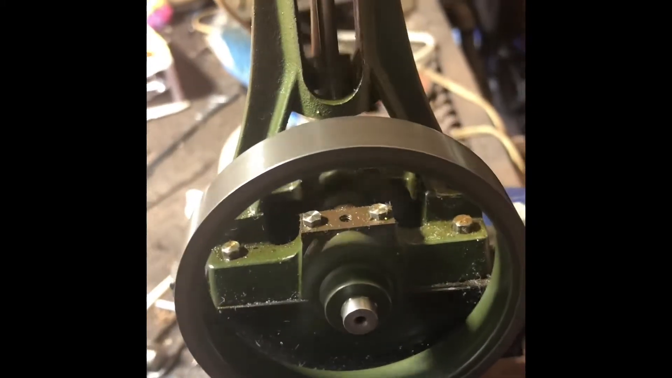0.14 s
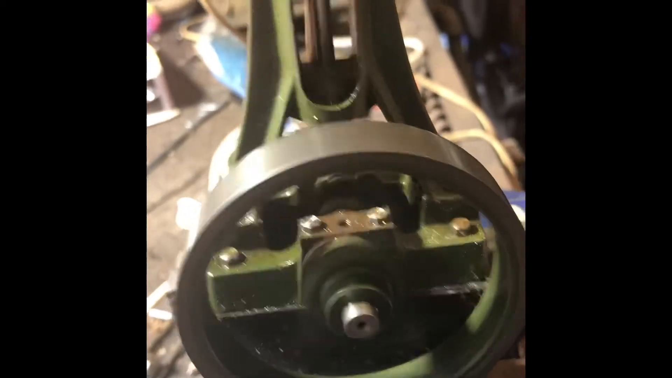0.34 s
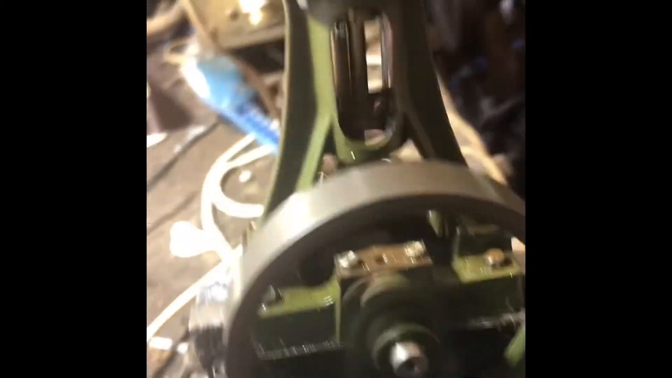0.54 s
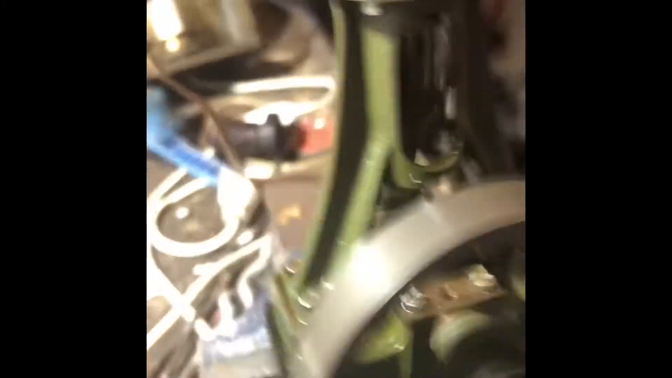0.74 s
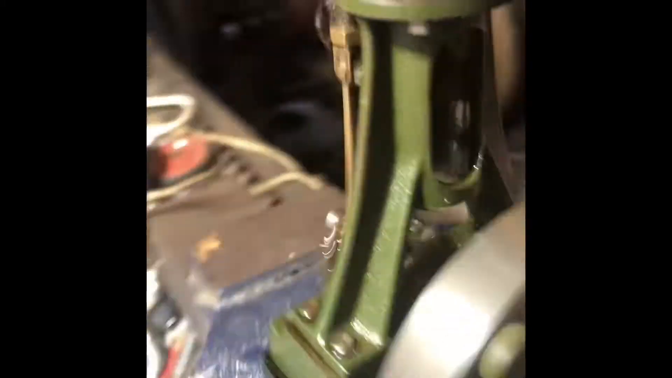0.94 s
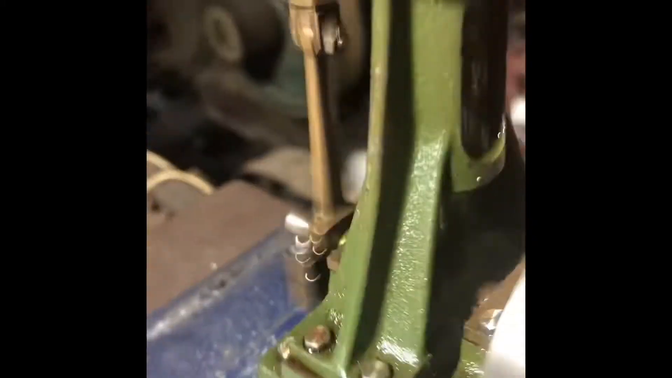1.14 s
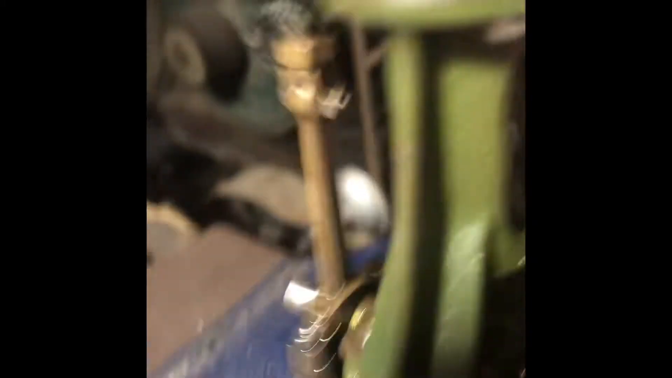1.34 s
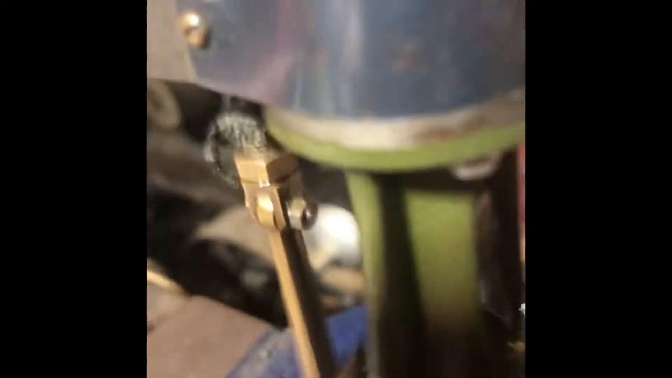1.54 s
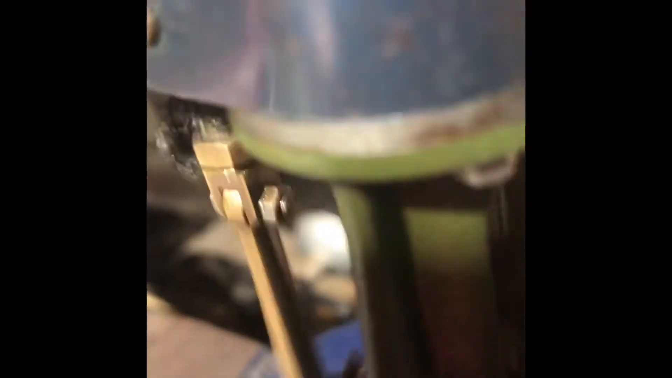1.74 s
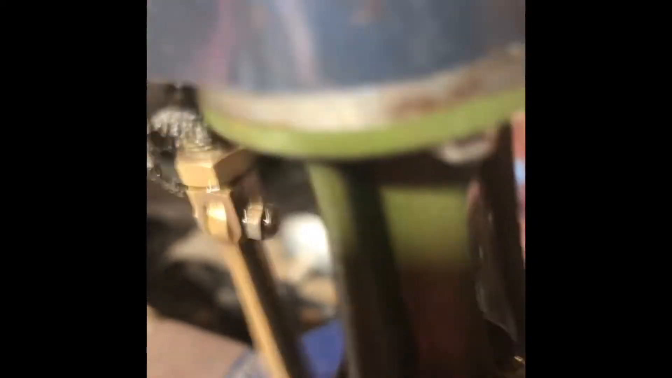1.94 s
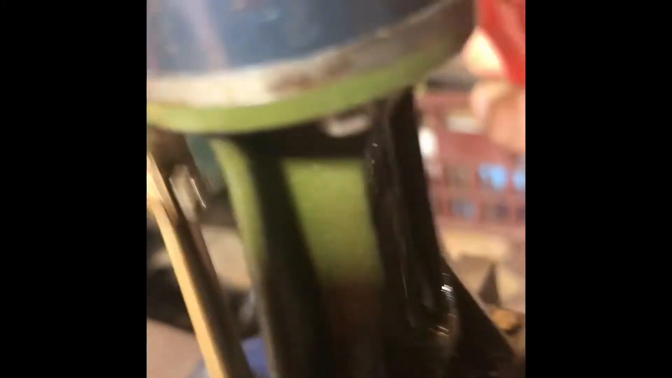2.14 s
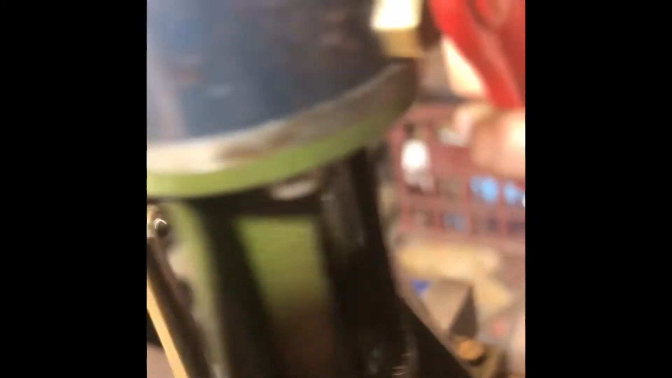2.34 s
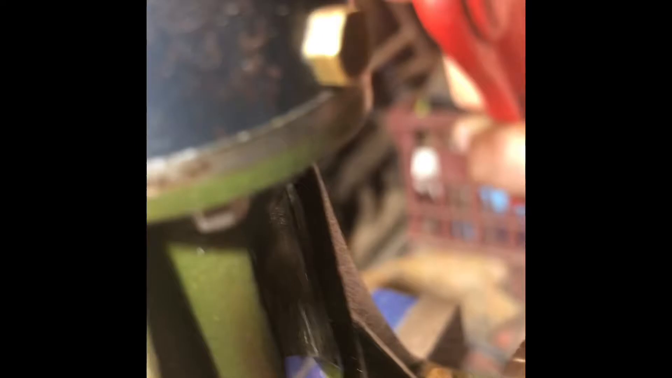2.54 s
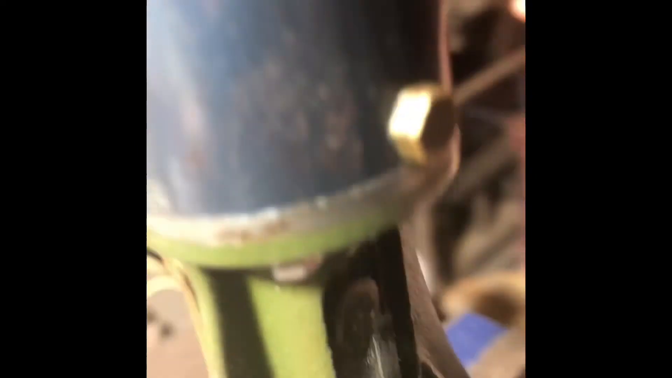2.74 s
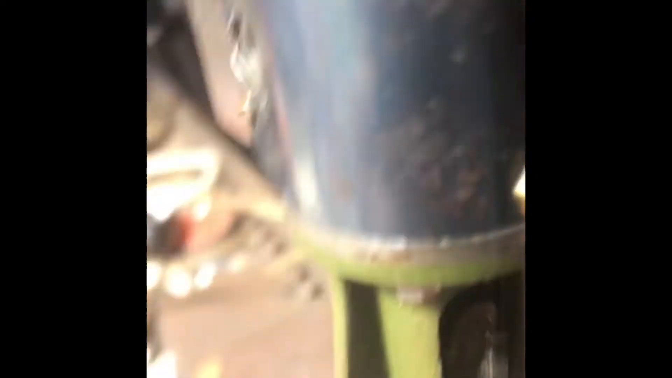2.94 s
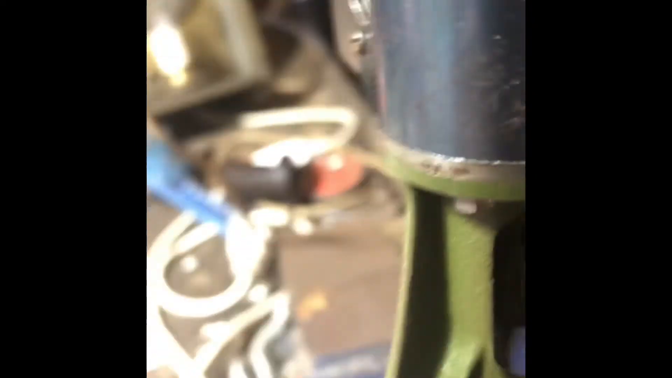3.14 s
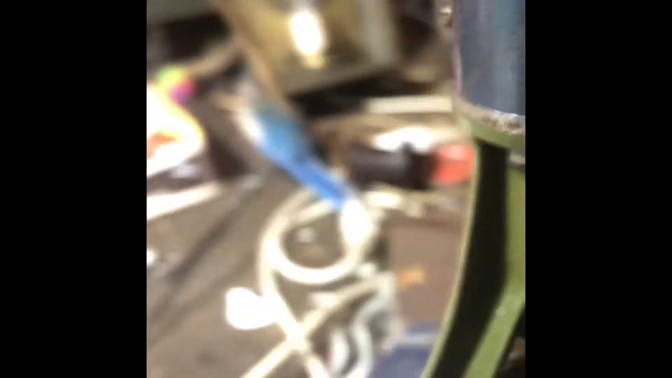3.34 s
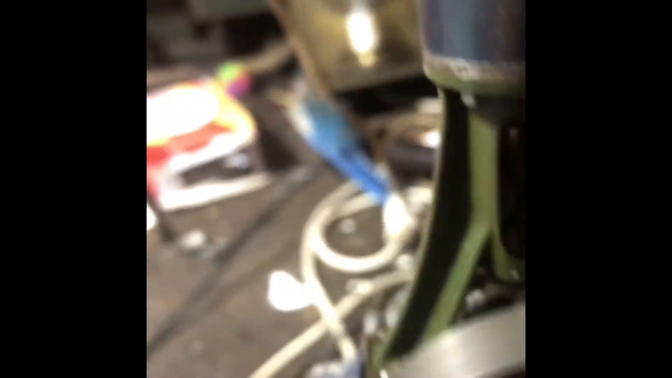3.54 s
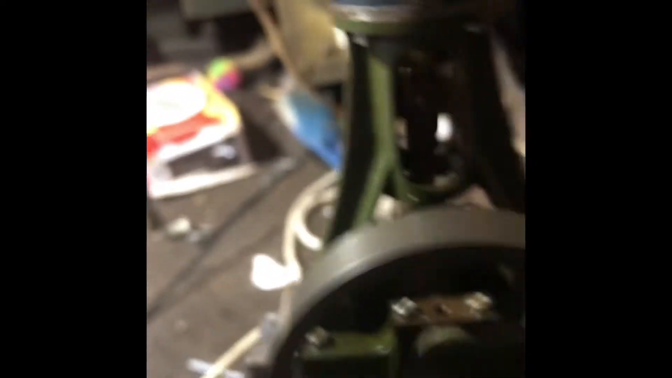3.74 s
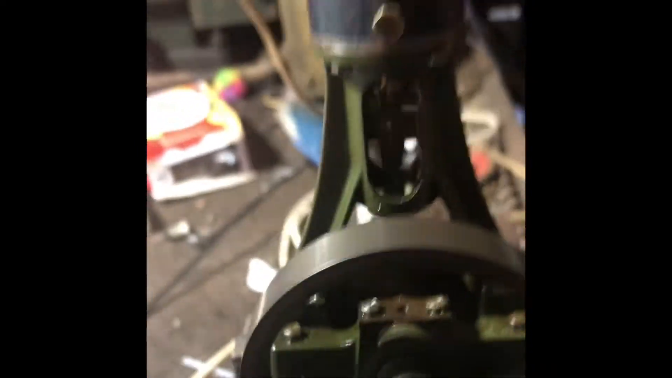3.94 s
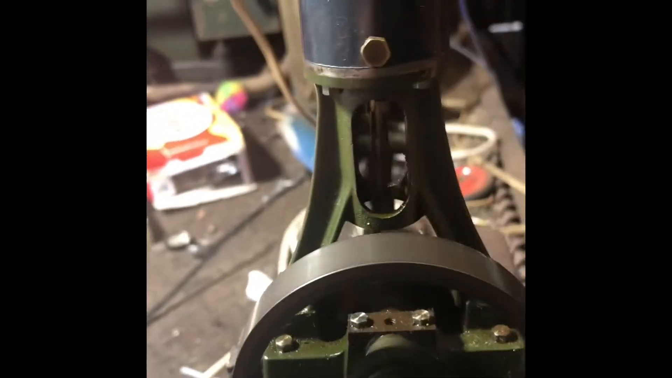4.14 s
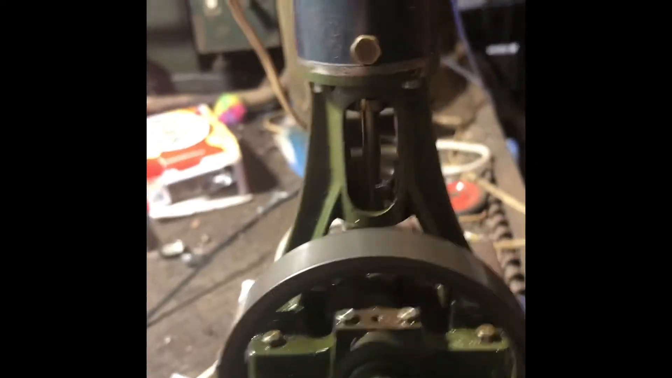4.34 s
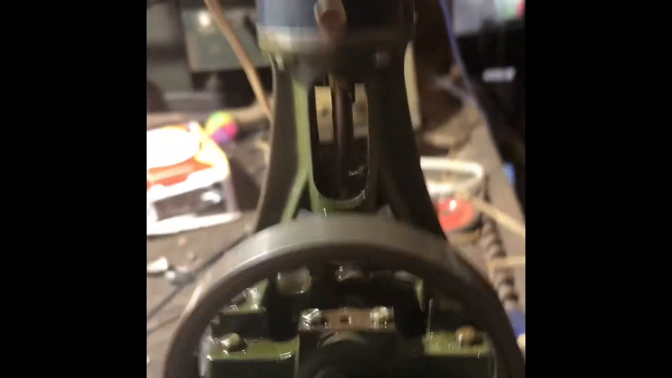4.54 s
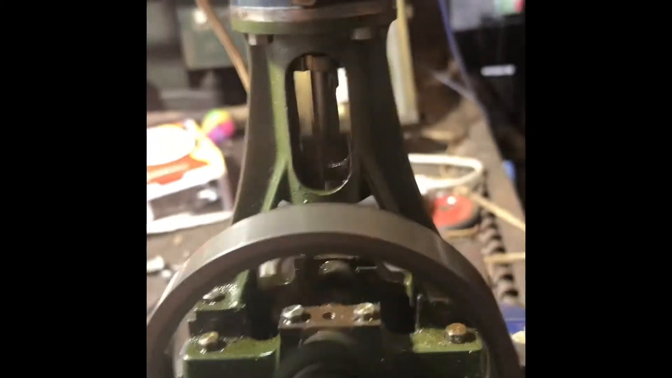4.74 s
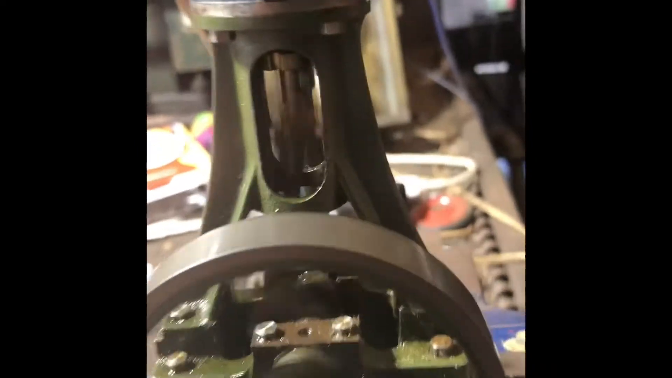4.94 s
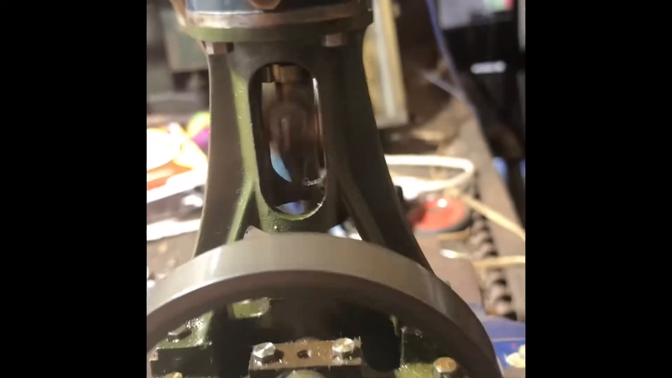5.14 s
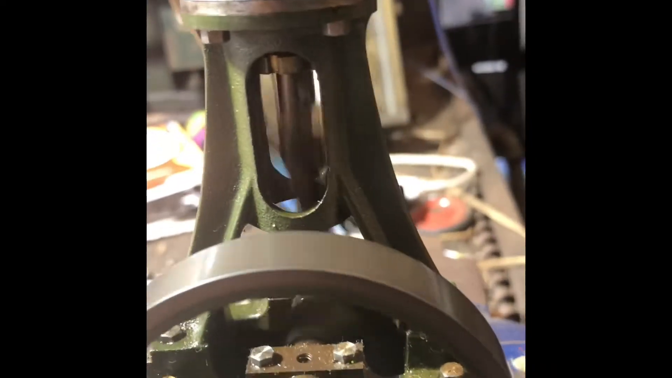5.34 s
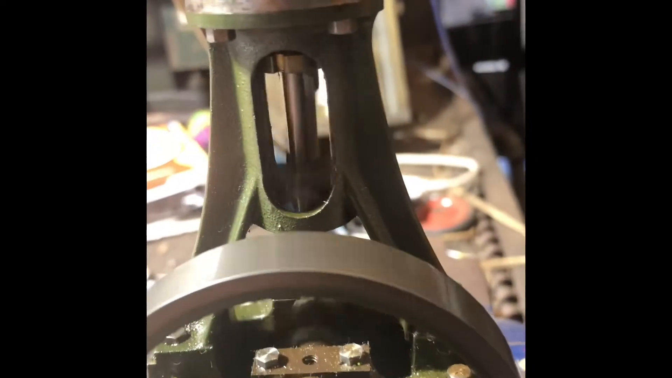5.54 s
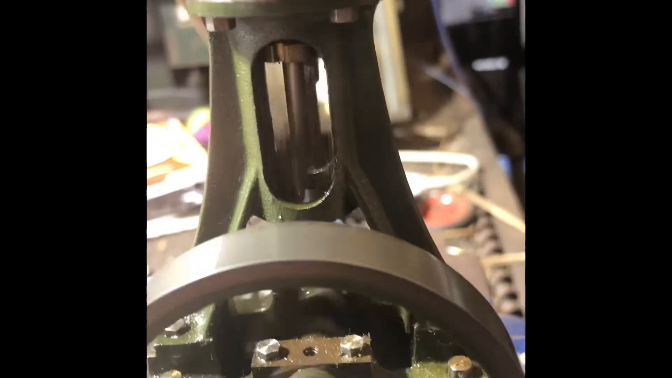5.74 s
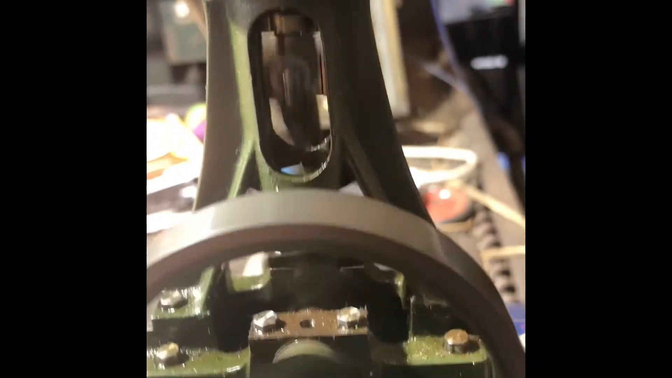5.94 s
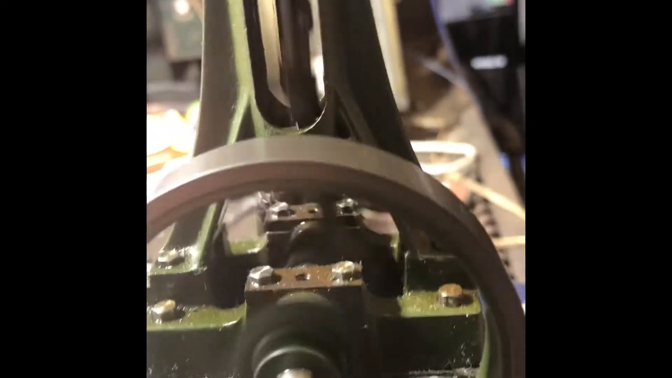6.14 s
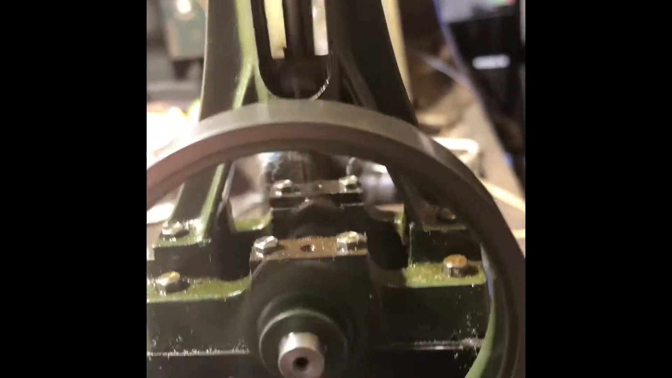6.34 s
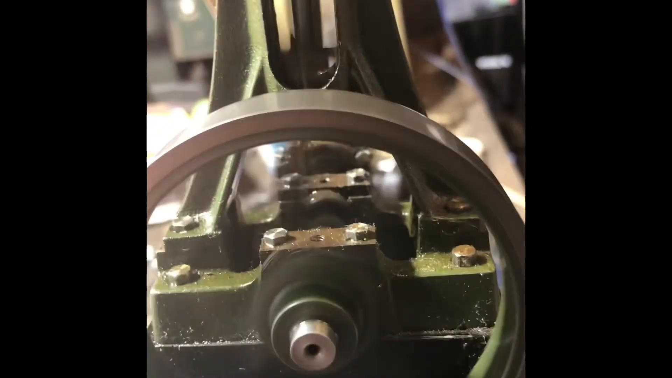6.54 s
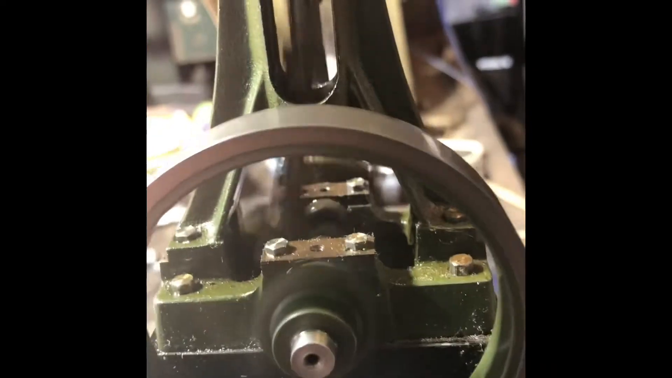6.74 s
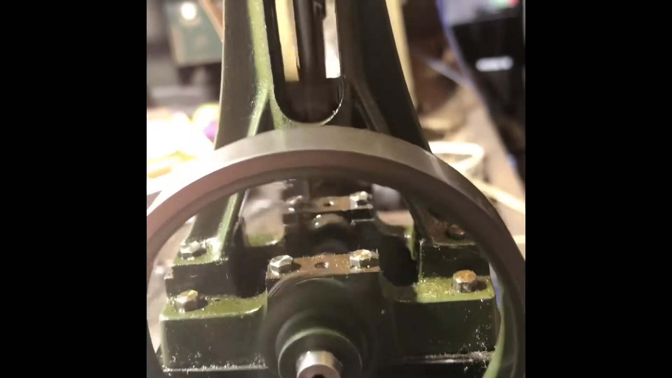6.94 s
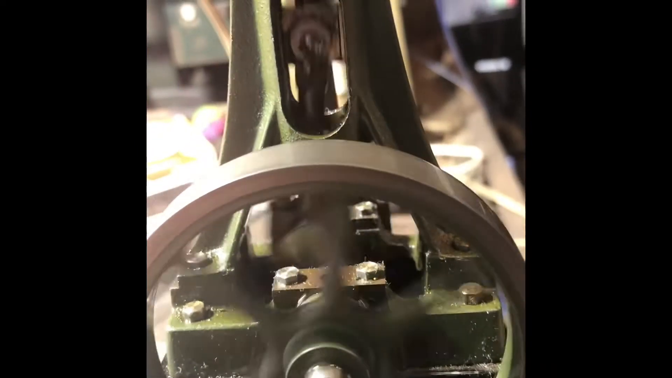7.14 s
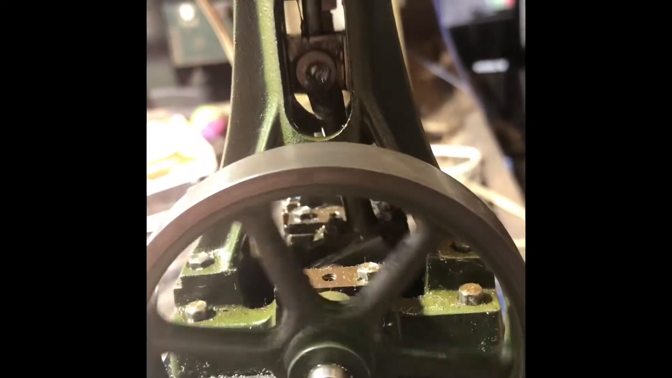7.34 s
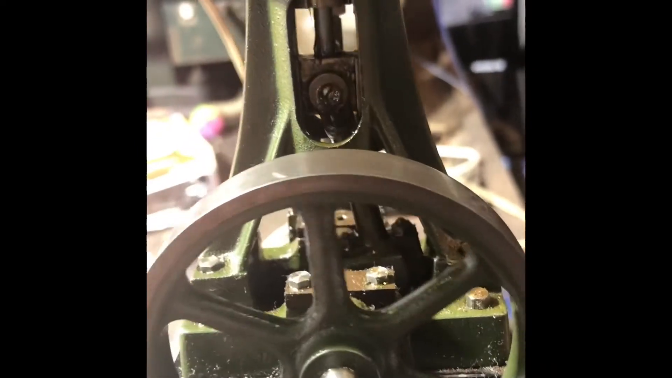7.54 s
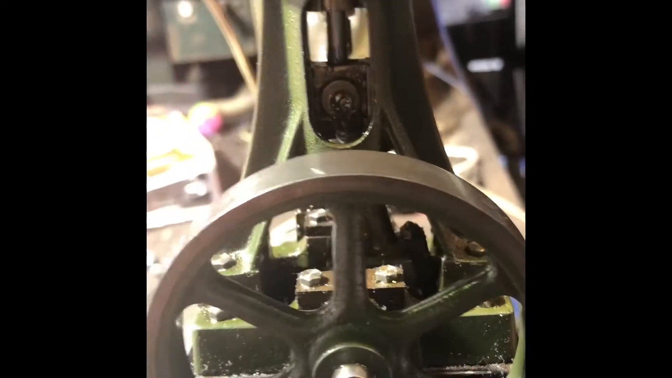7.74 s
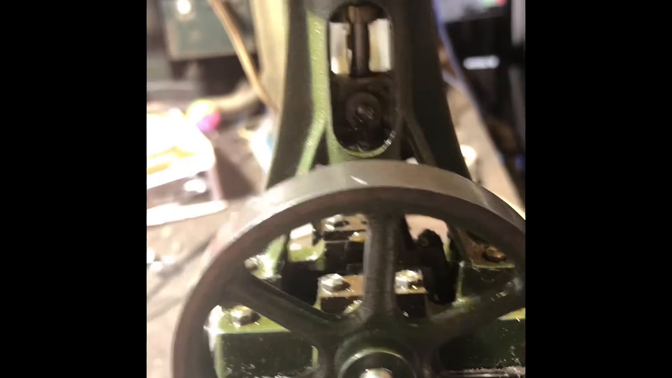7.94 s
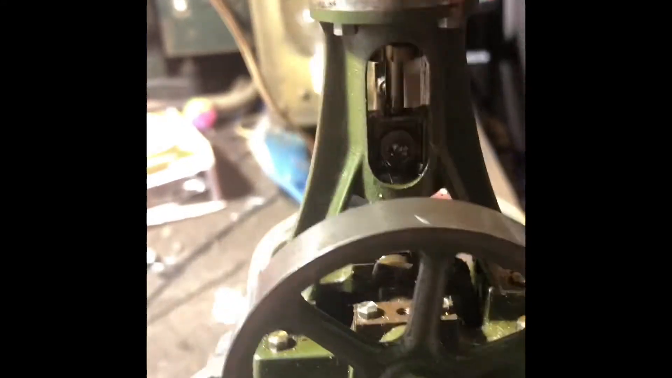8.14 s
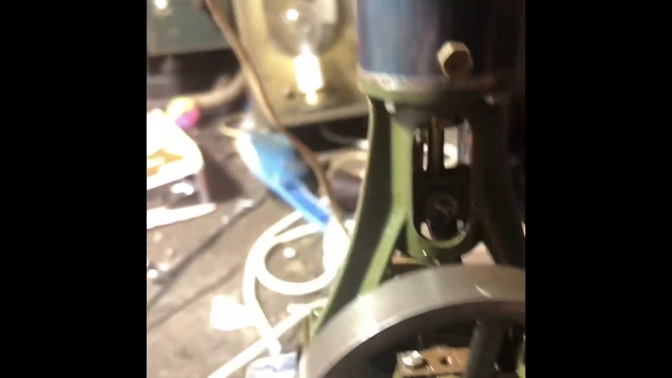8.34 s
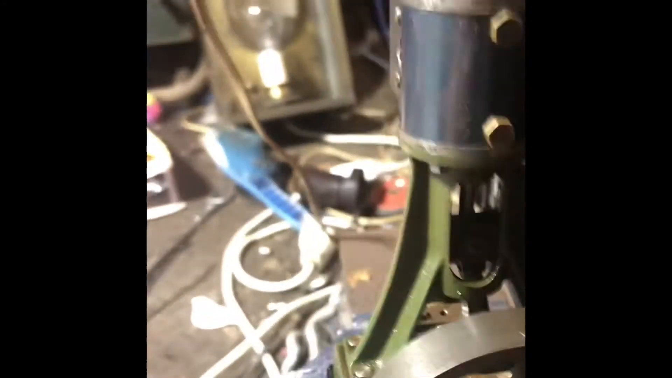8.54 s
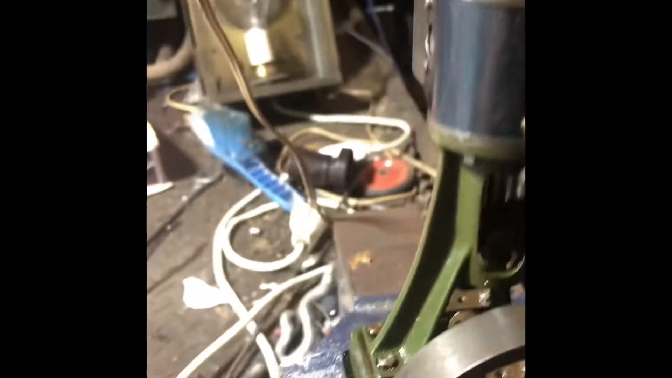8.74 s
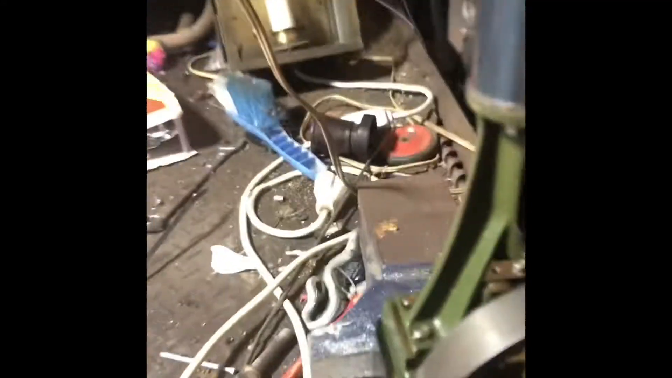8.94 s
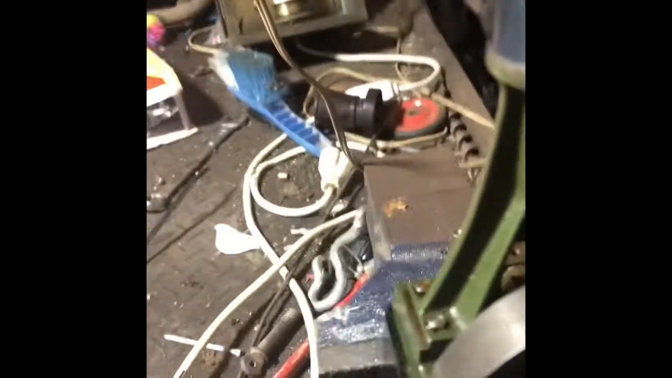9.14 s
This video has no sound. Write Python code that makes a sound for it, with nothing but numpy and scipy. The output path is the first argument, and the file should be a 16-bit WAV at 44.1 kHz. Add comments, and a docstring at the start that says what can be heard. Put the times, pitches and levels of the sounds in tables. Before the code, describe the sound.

A small steam engine hisses and chuffs rapidly on compressed air, then shuts off, leaving a compressor droning and rattling.

```python
"""Steam engine on compressed air

A small double-acting engine spins on a workbench, heard from a hand-held microphone that circles it.
Its exhaust, a turbulent jet, hisses and chuffs twice a turn and a leak whistles, until the air is shut
off with a metallic ping. Dull bumps and light clicks sound nearby. A piston compressor drones and
rattles in the workshop, held down by automatic gain control until the hiss ends."""
import sys
import numpy as np
from scipy import signal
from scipy.fft import rfft, irfft, next_fast_len
from scipy.io import wavfile
from scipy.ndimage import uniform_filter1d, map_coordinates

SR = 44100
rng = np.random.default_rng(int(sys.argv[2]) if len(sys.argv) > 2 else 0)


def generate_wav(signal):
    """Clip the signal to [-1, 1] and save it as 16-bit WAV at the path in sys.argv[1]."""
    frames = np.transpose(np.atleast_2d(signal))
    scaled = np.clip(frames, -1, 1) * 32767
    pcm = np.round(scaled).astype(np.int16)
    wavfile.write(sys.argv[1], SR, pcm)


N = 405259
TIME = np.arange(N) / SR
CUTOFF_HZ = 15800

# microphone's path; sides are 0 flywheel, 1 cylinder, 2 flank, 3 column:
# (time [s], side [index], relative exhaust level [dB], comb spacing of the bench echo [Hz])
MIC_PATH = [(0, 0, -7, 2210), (.55, 0, -5.5, 2060), (1.25, 1, 0.7, 1860), (1.9, 1, -0.5, 1970),
            (2.85, 1.5, -3.5, 1860), (3.3, 2.5, -9.5, 1820), (3.75, 2.5, -10.5, 2025), (4.5, 3, -11, 2190),
            (5.3, 3, -10, 2090), (5.9, 3, -10, 2240), (6.3, 3, -9.5, 2370), (6.85, 3, -9, 2340)]
# directivity, a row per side: (puff depth [factor on dB], leak gain [dB], thud gain [dB])
DIRECTIVITY = [(0.83, -1.5, 1), (1.36, 1, -1), (0.98, 2.5, 1.5), (0.66, 1, 0)]
# crankshaft: (time [s], speed [turns/s])
CRANK_SPEED = [(0.0, 20.84), (0.8, 21.09), (1.2, 20.17), (1.6, 18.08), (2.0, 16.26), (2.4, 16.28),
               (2.8, 15.17), (3.2, 14.96), (3.6, 14.92), (4.0, 14.55), (4.4, 14.69), (4.8, 15.38),
               (5.6, 16.59), (6.4, 15.87), (6.8, 15.7)]
def engine():
    """Angle is the integral of speed: the crank times the air's release until the cock closes."""
    speed, = in_time(CRANK_SPEED)
    turn = np.cumsum(speed) / SR
    side, level_db, comb_hz = in_time(MIC_PATH)
    depth, leak_db, thud_db = [np.interp(side, range(4), c) for c in np.transpose(DIRECTIVITY)]
    hiss = from_db(level_db - 1.5) * exhaust(turn, side, depth, leak_db, comb_hz)
    thuds = chuffs(turn, speed, thud_db + 0.81 * level_db)
    pipe = coloured([(100, -16), (450, 0), (800, -2.5), (1100, -6.5), (1500, -1), (4000, -58)])
    shut_at_s, closing_s = 6.84, 0.17
    flow = from_db(-60 * np.clip((TIME - shut_at_s) / closing_s, 0, 2) ** 2)
    return flow * (hiss + thuds + from_db(-38) * pipe)


# valve cycle, relative levels: (crank angle [turns], rush [dB], sizzle [dB], leak [dB])
VALVE_CYCLE = [(0, 1.9, 1.5, -4), (.13, 2, 4.5, -1.5), (.26, 3, 5.5, -1), (.39, 1, 5, -12),
               (.48, -3.5, 2, -30), (.56, -2, 2.5, -23), (.66, 0.5, 7, -31), (.82, 2, 5.5, -21),
               (.93, -2, 4.5, 3)]
def exhaust(turn, side, depth, leak_side_db, comb_hz):
    """Amplitude modulation: the valve lets out two unequal puffs a turn, and oil makes them spit."""
    angle, *columns = np.transpose(VALVE_CYCLE)
    rush_db, sizzle_db, leak_db = [np.interp(turn, angle, c, period=1) for c in columns]
    puffs = hollow_ring(jet(side, depth * rush_db, depth * sizzle_db), comb_hz)
    whistling = leak(leak_db + leak_side_db)
    spitting = from_db(0.94 * drift(450) + 0.4 * drift(60))
    puffs = near_echoes(from_db(-2) * puffs, comb_hz, bench_db=-27)
    whistling = near_echoes(whistling, comb_hz, bench_db=-2)
    return spitting * (puffs + whistling)


# jet spectrum from each side: (frequency [Hz], relative density [dB])
JET_AT_FLYWHEEL = [(590, -49), (1000, -21), (1220, -25), (1510, -21), (1760, -20.5), (3130, -15.5),
                   (4080, -6.5), (4580, -5.5), (5190, -9.5), (6470, -5), (7090, -8), (8620, -1.5),
                   (10100, -6.5), (12600, -3.5), (15700, -10.5)]
JET_AT_CYLINDER = [(590, -59), (1000, -22.5), (1330, -23.5), (1500, -26.5), (1700, -18.5), (2270, -22.5),
                   (2920, -10.5), (3510, -7), (4030, -6), (5900, -2.5), (6770, -5), (8720, 0), (9900, -3.5),
                   (12200, 0), (15700, -7)]
JET_AT_FLANK = [(590, -58), (1000, -29), (1110, -14), (1230, -25), (1330, -14), (1440, -25), (1510, -17),
                (1920, -16.5), (3210, -9.5), (3950, -1.5), (5020, -5.5), (7070, -1), (9970, 2.5),
                (15400, 0)]
JET_AT_COLUMN = [(590, -42), (1000, -19), (1300, -20.5), (1410, -18.5), (1700, -15.5), (3760, -11.5),
                 (4170, -7), (4580, -6.5), (5320, -8), (7170, -6), (8330, -1.5), (11200, -4.5), (12300, -3),
                 (15200, -5.5), (15700, 0.5)]
def jet(side, rush_db, sizzle_db, split_hz=11000):
    """Turbulence radiates broadband noise whose spectrum depends on direction."""
    spectra = (JET_AT_FLYWHEEL, JET_AT_CYLINDER, JET_AT_FLANK, JET_AT_COLUMN)
    noise = sum(np.sqrt(np.clip(1 - abs(side - k), 0, 1)) * coloured(spectrum)
                for k, spectrum in enumerate(spectra))
    rush = cut(noise, split_hz, "low", order=4) * from_db(rush_db)
    sizzle = cut(noise, split_hz, "high", order=4) * from_db(sizzle_db)
    puffs = rush + sizzle
    return puffs - 0.31 * resonance(puffs, 10980, 4000)   # weaker where the leak sings


def hollow_ring(x, comb_hz):
    """Cavity resonance between the castings: a peak with a dip below it, moving with the microphone."""
    climb_octaves = 0.15 * np.maximum(TIME - 5.9, 0)   # the microphone sinks toward the bed plate
    peak_hz = 4485 * (comb_hz / 2125) ** 0.86 * 2 ** climb_octaves
    return x + 0.43 * band(x, peak_hz, width_hz=1800) - 0.5 * band(x, 0.847 * peak_hz, width_hz=335)


# whistle of the leak: (frequency [Hz], bandwidth [Hz], relative level [dB])
LEAK_TONES = [(11130, 2000, -4), (9570, 600, -12)]
def leak(level_db):
    """Acoustic shadow: the leak's whistle fades while the cylinder hides it from the microphone."""
    hidden_from_s, hidden_to_s, fade_s = 1.1, 3.63, 0.45
    shadow_db = -18 * np.clip(np.minimum(TIME - hidden_from_s, hidden_to_s - TIME) / fade_s, 0, 1)
    tones = sum(from_db(db) * whistle(hz, width) for hz, width, db in LEAK_TONES)
    return tones * from_db(level_db + shadow_db)


def near_echoes(x, comb_hz, bench_db):
    """Comb filtering: echoes off bench and castings interfere, sweeping as the microphone moves."""
    castings = sum(delayed(x, lag_s + 0.00008 * drift(1.5)) for lag_s in (0.000933, 0.0023))
    return x + from_db(bench_db) * delayed(x, 1 / comb_hz) + from_db(-17) * castings


def chuffs(turn, speed, gain_db):
    """Pulse excitation: air freed at each dead centre thuds, harder at speed, and shakes the bench."""
    stroke_phase = (2 * turn + 0.099) % 1
    pulse = np.exp(-stroke_phase / 0.23)
    push = rms_one(resonance(pulse, 216, 160))
    eddies = rms_one(resonance(rng.standard_normal(N) * (pulse + 0.25), 220, 165))
    thud = rms_one(cut(cut(push + 1.63 * eddies, 410, "low"), 92, "high"))
    bench = resonance(pulse * from_db(3 * drift(20)), hz=62, width_hz=26)
    shake = from_db(-12) * rms_one(cut(bench, 124, "low"))
    speed_db = 0.76 * (speed - 17)
    return from_db(-29 + gain_db + speed_db) * (thud + shake)


# modes of the brass fitting: (frequency [Hz], relative level [dB], 60 dB decay time [s])
FITTING_MODES = [(8683, -11, 0.2), (9400, -16, 0.37), (10920, 1.5, 0.3)]
def ping(at_s=6.968):
    """Free vibration: a brass fitting rings in damped modes as the air stops."""
    return from_db(-27) * sum(from_db(db) * decay(at_s, t60) * np.sin(2 * np.pi * hz * TIME)
                              for hz, db, t60 in FITTING_MODES)


# light metal contacts: (time [s], level [dB])
CLICKS = [(6.968, -41), (7.857, -29.5), (7.881, -38)]
def clicks():
    """Brief contacts have broad spectra: bright noise that dies quickly."""
    noise = coloured([(600, -20.5), (1800, 6), (6000, 1), (12000, -7), (15700, -7)])
    return noise * sum(from_db(db) * decay(s, t60=0.053) for s, db in CLICKS)


# dull impacts, before smoothing: (time [s], level [dB], 60 dB decay time [s])
BUMPS = [(3.78, -36.5, 0.25), (4.0, -28, 0.16), (5.55, -35, .2), (5.88, -24, 0.22), (6.2, -28, .15),
         (6.45, -21, .15), (7.07, -33, 0.62), (7.19, -28, 0.53), (7.269, -38, 0.24), (7.49, -31, 0.81),
         (7.97, -35, 0.17), (8.04, -30, 0.11), (8.8, -31, 0.116)]
def bumps():
    """Soft impacts carry mostly low frequencies: bursts of dark noise with rounded onsets."""
    envelope = uniform_filter1d(sum(from_db(db) * decay(s, t60) for s, db, t60 in BUMPS), size=1300)
    return envelope * coloured([(25, -12), (55, -2), (180, 0.5), (320, -5.5), (900, -23), (3000, -55)])


def knock(at_s=8.79):
    """Heavy damping broadens a resonance: one dull knock of vague pitch."""
    body = rms_one(resonance(rng.standard_normal(N), hz=820, width_hz=250))
    return cut(from_db(-30) * decay(at_s, t60=0.15) * body, 1320, "low")


COMPRESSOR_HZ = 45.94
# path through the drone's field: (time [s], position [0 at the engine, 1 aside], level [dB])
DRONE_PATH = [(0, 0.3, -27), (.7, 0.66, -28.7), (2.9, 0.59, -30.5), (4.4, 0.05, -32.5), (5.6, 0.25, -31),
              (7.65, 0, -29.5), (8.3, 0.83, -28.5), (9.2, 0.93, -29)]
def compressor():
    """Standing waves: the steady pump changes in level and timbre as the microphone moves."""
    cycle = COMPRESSOR_HZ * TIME + 0.003 * drift(3)
    aside, level_db = in_time(DRONE_PATH)
    return from_db(level_db) * (drone(cycle, aside) + from_db(-23.5) * rattle(cycle))


# pump spectrum at two places: (harmonic [number], relative level [dB])
DRONE_AT_ENGINE = [(1, -18), (2, -3), (3, -6), (4, -2), (5, -4), (6, -3.5), (7, 2), (8, 0.5), (9, -1),
                   (10, -12.5), (11, -7.5), (12, -10.5), (13, -23), (14, -3.5), (15, -5), (16, -7),
                   (17, 1.5), (18, 1.5), (19, -2), (20, -18), (21, -37), (22, -18), (23, -32.5), (24, -18),
                   (25, -30), (26, -16), (27, -21), (28, -17), (29, -13), (30, -1), (31, -13), (32, -10.5),
                   (33, -8), (34, -11)]
DRONE_ASIDE = [(1, -15), (2, -1.5), (3, -10.5), (4, -1.5), (5, -5.5), (6, -8), (7, -6), (8, -4), (9, -7.5),
               (10, -27), (11, -14), (12, -11), (13, -20), (14, -14.5), (15, -21.5), (16, -12.5), (17, 0),
               (18, -4), (19, -3.5), (20, -15), (21, -19), (22, -17.5), (23, -24), (24, -18), (25, -15.5),
               (26, -15), (27, -20), (28, -15), (29, -9.5), (30, -10), (31, -21), (32, -11), (33, -6.5),
               (34, -26)]
# the piston thumps first, the shell rings later: (frequency [Hz], group delay [cycles])
DRONE_DELAY = [(46, 0.772), (230, 0.7575), (400, 0.4895), (600, 0.799), (830, 1.01), (1000, 1.15),
               (1500, 1.28)]
def drone(cycle, aside):
    """Periodic forcing: the piston radiates a harmonic series."""
    harmonics = np.arange(1, len(DRONE_ASIDE) + 1)
    lags = np.cumsum(np.interp(harmonics * COMPRESSOR_HZ, *np.transpose(DRONE_DELAY)))
    smear = np.interp(harmonics, [3, 10], [0.09, 0.23])   # wall echoes scatter the upper phases most
    lags += smear * rng.standard_normal(len(lags))
    spectra = [from_db(np.interp(harmonics, *np.transpose(t))) for t in (DRONE_AT_ENGINE, DRONE_ASIDE)]
    near, far = [gains * np.sqrt(2 / np.sum(gains ** 2)) for gains in spectra]
    return sum((a + aside * (b - a)) * from_db(0.5 * drift(1.486)) * np.cos(2 * np.pi * (k * cycle - lag))
               for k, a, b, lag in zip(harmonics, near, far, lags))


# rattling parts: (nominal frequency [Hz], bandwidth [Hz], relative level [dB], time when loudest [s])
LOOSE_PARTS = [(1790, 200, 5.5, 7.65), (2067, 29, 0.5, 7.55), (2250, 90, -5, 8.6), (2802, 5, 1.5, 8.2),
               (2986, 10, 0.5, 7.62), (3715, 11, -3, 7.6), (4310, 6.4, 1, 7.97), (5760, 100, -1, 8.6),
               (9070, 180, 1, 7.8)]
def rattle(cycle):
    """Forced vibration: contacts repeat each cycle, so each part rings at the nearest pump harmonic."""
    contacts = rng.standard_normal(960)
    index = (cycle % 1 * len(contacts)).astype(int) % len(contacts)
    shaking = contacts[index] + 0.063 * rng.standard_normal(N)
    sound = np.zeros(N)
    for hz, width_hz, db, loudest_s in LOOSE_PARTS:
        harmonic_hz = COMPRESSOR_HZ * np.round(hz / COMPRESSOR_HZ)
        passing_db = 5 * (np.exp(-((TIME - loudest_s) / 0.47) ** 2) - 1)   # the microphone passes by
        sound += from_db(db + passing_db) * rms_one(resonance(shaking, harmonic_hz, width_hz))
    return sound


# room noise: (frequency [Hz], relative density [dB])
WORKSHOP_SPECTRUM = [(25, -20), (55, 3.5), (150, -3), (400, -6), (800, -3), (1100, -18.5), (1450, -6),
                     (2000, -16), (4000, -16.5), (6500, -19), (8000, -23.5), (12000, -27.5), (15700, -22.5)]
def workshop():
    """Stationary noise forms the floor under all other sounds."""
    return from_db(-38.5) * coloured(WORKSHOP_SPECTRUM)


def from_db(db):
    """Decibels to amplitude ratio."""
    return 10 ** (np.asarray(db) / 20)


def rms_one(x):
    """Normalisation to unit rms."""
    return x / np.sqrt(np.mean(x ** 2) + 1e-20)


def in_time(rows):
    """Linear interpolation of each column over time."""
    s, *columns = np.transpose(rows)
    return [np.interp(TIME, s, c) for c in columns]


def drift(rate_hz):
    """Random fluctuation of unit rms."""
    points = rng.standard_normal(int(TIME[-1] * rate_hz) + 3)
    return rms_one(np.interp(TIME * rate_hz, np.arange(len(points)), points))


def coloured(spectrum):
    """Spectral shaping: unit-rms noise from (frequency [Hz], relative density [dB])."""
    size = next_fast_len(N)
    freqs = np.maximum(np.arange(size // 2 + 1) * SR / size, 1)
    hz, db = np.transpose(spectrum)
    gain = from_db(np.interp(np.log(freqs), np.log(hz), db)) * (freqs < 1.03 * CUTOFF_HZ)
    return rms_one(irfft(rfft(rng.standard_normal(size)) * gain, size)[:N])


def whistle(centre_hz, width_hz):
    """Narrowband noise: a carrier of randomly wandering amplitude and phase sounds breathy."""
    steps = width_hz * TIME
    points = rng.standard_normal((2, int(steps[-1]) + 4))
    cosine, sine = [map_coordinates(row, [steps], order=3) for row in points]
    angle = 2 * np.pi * centre_hz * TIME
    return rms_one(cosine * np.cos(angle) + sine * np.sin(angle))


def cut(x, hz, kind, order=2):
    """Maximally flat low-pass or high-pass filter."""
    return signal.sosfilt(signal.butter(order, hz, kind, fs=SR, output="sos"), x)


def resonance(x, hz, width_hz):
    """Two-pole resonator with unit peak gain."""
    r = np.exp(-np.pi * width_hz / SR)
    feedback = [1, -2 * r * np.cos(2 * np.pi * hz / SR), r * r]
    return signal.lfilter(np.array([1, 0, -1]) * (1 - r * r) / 2, feedback, x)


def band(x, centre_hz, width_hz):
    """Heterodyne band-pass around a moving centre."""
    carrier = np.exp(2j * np.pi * np.cumsum(centre_hz) / SR)
    return 2 * np.real(cut(x / carrier, width_hz / 2, "low", order=1) * carrier)


def decay(start_s, t60):
    """Exponential decay, 60 dB in t60 seconds."""
    age = TIME - start_s
    return from_db(-60 * np.maximum(age, 0) / t60) * ((age >= 0) & (age < 2 * t60))


def delayed(x, lag_s):
    """Propagation delay that may vary in time."""
    return map_coordinates(x, [(TIME - lag_s) * SR], order=3)


def scene():
    """Superposition: all sources add at one microphone, alike in both channels."""
    sound = engine() + compressor() + bumps() + knock() + clicks() + ping() + workshop()
    return np.array([sound, sound])


def gain_control(x, threshold_db, squeeze, release_db_per_s):
    """Dynamic compression: loud sound lowers the gain quickly, and it creeps back afterwards."""
    level_db = 10 * np.log10(uniform_filter1d(x[0] ** 2, size=2800) + 1e-12)
    reduction_db = squeeze * np.maximum(level_db - threshold_db, 0)
    release_db = release_db_per_s * TIME
    held_db = np.maximum.accumulate(reduction_db + release_db) - release_db
    return x * from_db(-uniform_filter1d(held_db, size=2000))


def record(dry):
    """Limited bandwidth and range: bass cut, gain control, peak clipping and a steep treble cut."""
    bass_cut = cut(dry, 38, "high")
    levelled = gain_control(bass_cut, threshold_db=-16.5, squeeze=0.83, release_db_per_s=5.0)
    clipped = np.clip(levelled, -0.85, 0.85)
    return signal.sosfilt(signal.ellip(12, 0.1, 80, CUTOFF_HZ, fs=SR, output="sos"), clipped)


dry = scene()
out = record(dry)
generate_wav(out)
```